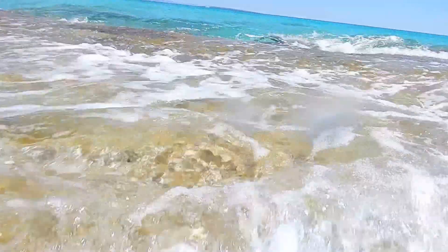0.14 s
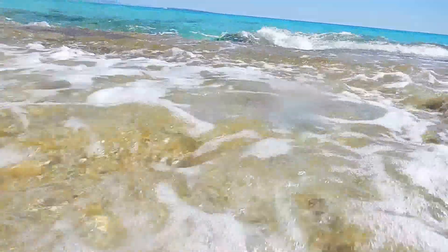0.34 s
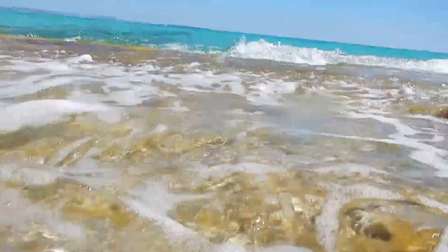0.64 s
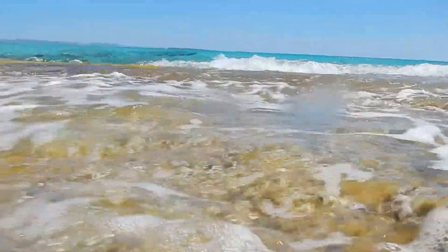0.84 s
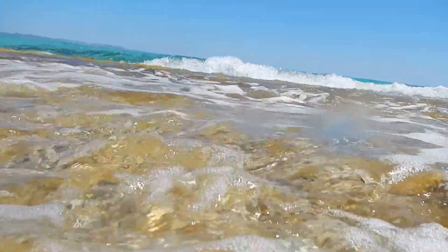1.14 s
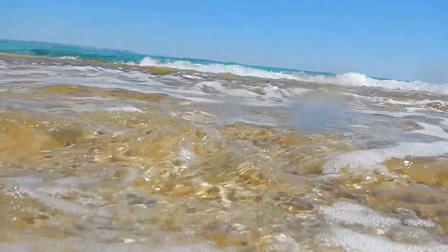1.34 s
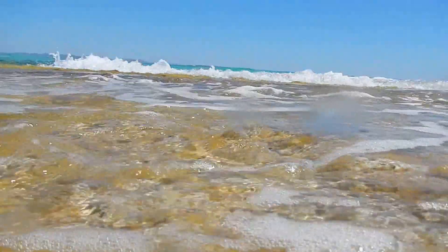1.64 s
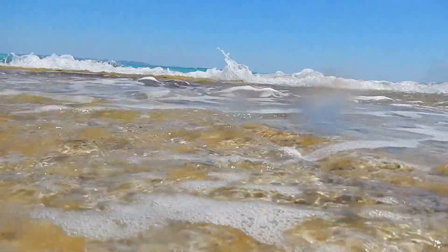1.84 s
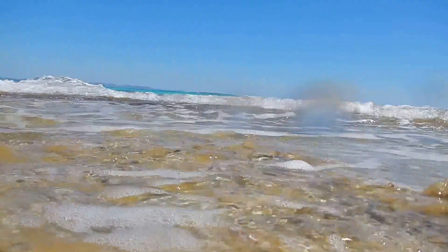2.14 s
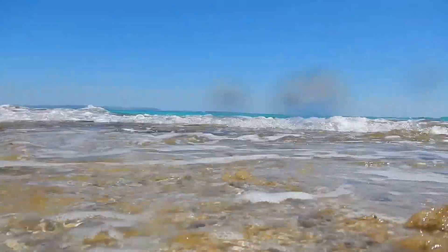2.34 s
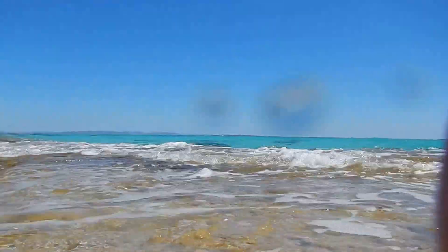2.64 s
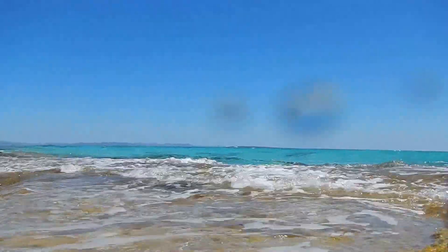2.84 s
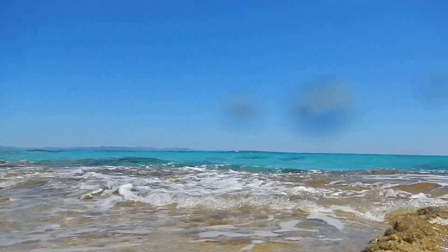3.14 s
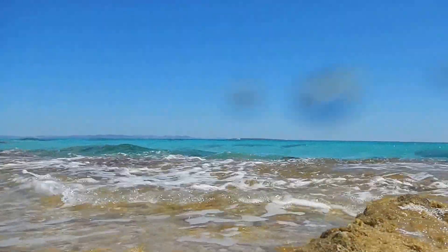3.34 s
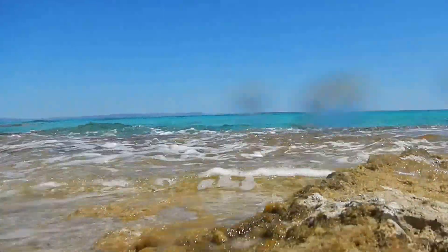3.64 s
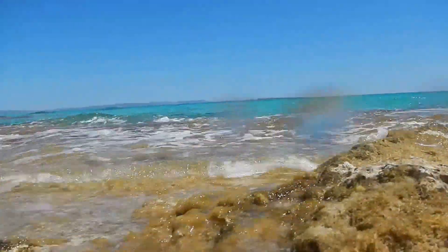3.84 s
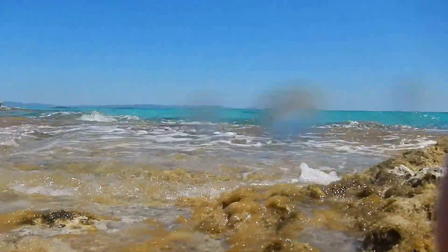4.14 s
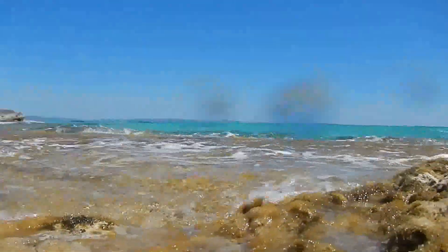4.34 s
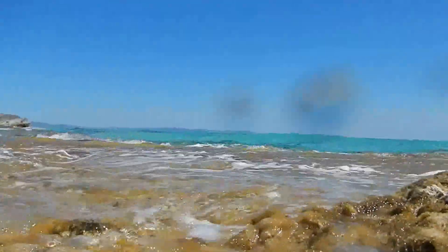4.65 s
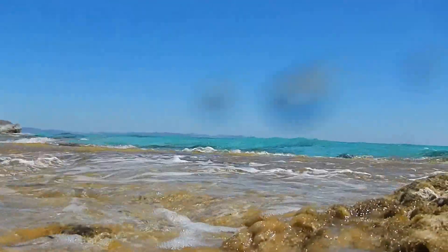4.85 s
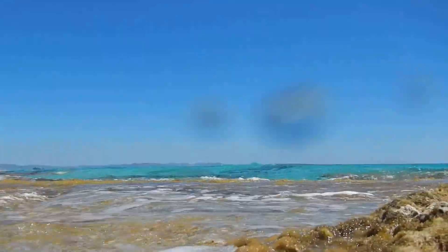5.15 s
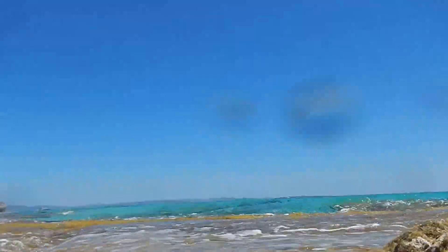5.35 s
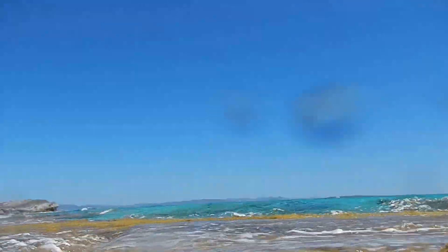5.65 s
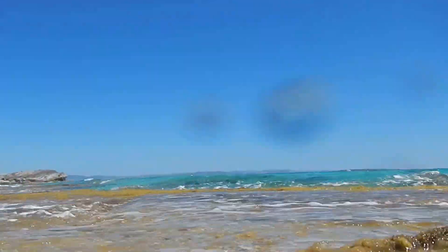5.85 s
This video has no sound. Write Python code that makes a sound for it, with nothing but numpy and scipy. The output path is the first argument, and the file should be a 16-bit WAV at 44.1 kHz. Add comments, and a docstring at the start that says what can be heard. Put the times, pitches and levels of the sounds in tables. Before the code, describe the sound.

Small waves wash over sand and shallow rocks, with steady bubbling and crackling foam, heard through a waterproof camera held just above the water. The tone is boxy. Drops and spray tap the case throughout, and two hard knocks early on briefly duck the volume. Wet fingers scrape the case midway, and near the end the grip slips in a quick run of ticks. A soft, uneven rumble comes and goes.

```python
"""Small waves around a waterproof camera

Surf, foam and bubbles wash over sand and rocks, heard through a camera case held just above the water.
The case rings near 1 kHz. Drops and spray strike it, fingers scrape and slip on it, and air and water
push on its two microphone openings, the ports. The camera turns itself down at each hard blow and
creeps back up, taking a faint electronic whine with it."""
import sys
import numpy as np
from scipy import signal
from scipy.fft import rfft, irfft, next_fast_len
from scipy.io import wavfile
from scipy.ndimage import uniform_filter1d, minimum_filter1d, map_coordinates

SR = 44100
rng = np.random.default_rng(int(sys.argv[2]) if len(sys.argv) > 2 else 0)


def unload_wav(signal):
    """Save mono or channel-first audio to the path in sys.argv[1] as 16-bit WAV at rate SR, clipped to [-1, 1]."""
    wavfile.write(
        sys.argv[1],
        SR,
        np.round(np.clip(np.atleast_2d(signal).T, -1, 1) * 32767).astype(np.int16),
    )


N = 265129

# How far the left port runs ahead of the right. Each row: frequency in Hz, lead in radians.
LEFT_LEAD = [(45, 4), (150, 2.5), (400, -0.08), (650, 1.49), (1000, -1.5), (1500, 1.68), (2300, -1.5),
             (4000, -1)]
SPLIT = np.array([[.5], [-.5]])  # shares a left-right difference between the two sides


def amp(db):
    """Turn decibels into a multiplier."""
    return 10 ** (np.asarray(db) / 20)


def unit(x):
    """Scale a signal to an average (rms) level of 1."""
    return x / np.sqrt(np.mean(x ** 2) + 1e-20)


def along(points, hz):
    """Read between (Hz, value) points, with octaves evenly spaced."""
    freqs, values = np.transpose(points)
    return np.interp(np.log(hz + 1), np.log(freqs + 1), values)


def wobble(rate):
    """A smooth curve through `rate` random values a second."""
    return map_coordinates(rng.standard_normal(int(N * rate / SR) + 4), [np.arange(N) * rate / SR])


def swell(s, rise, fall):
    """A bell curve that climbs to 1 at time s and sinks again."""
    t = np.arange(N) / SR - s
    return np.exp(-(t / np.where(t < 0, rise, fall)) ** 2 / 2)


def arch(n, skew):
    """A hump n samples long; a skew below 1 makes it peak early."""
    return np.sqrt(np.sin(np.pi * (np.arange(n) / n) ** skew))


def grains(n, rate, spread_db):
    """Two streams of tiny, uneven clicks at random times, about `rate` a second."""
    chance, size = rng.random((2, n)), rng.standard_normal((2, n))
    sign = np.sign(rng.standard_normal((2, n)))
    return (chance < rate / SR) * sign * amp(spread_db * np.clip(size, -2.5, 2.5))


def lowpass(x, hz):
    """Soften everything above hz."""
    return signal.sosfilt(signal.butter(2, hz, fs=SR, output="sos"), x)


def filtered(x, response):
    """Scale and shift each frequency by response(hz)."""
    size = next_fast_len(N + 8192)
    return irfft(rfft(x, size) * response(np.fft.rfftfreq(size, 1 / SR)), size)[..., :N]


def tinted(force, spectrum, tilt_db):
    """Send a force through a body that barely rings; tilt_db per octave brightens it."""
    hz = np.fft.rfftfreq(2048, 1 / SR)
    db = along(spectrum, hz) + tilt_db * np.log2(np.maximum(hz, 100) / 1000)
    # build the quickest response with this spectrum (minimum phase)
    cepstrum = irfft(np.log(amp(db)))
    causal = 1 + np.sign(np.fft.fftfreq(len(cepstrum)))
    response = irfft(np.exp(rfft(cepstrum * causal)))
    return signal.fftconvolve(force, response[None], axes=1)


def add(track, s, sound):
    """Mix a stereo sound into the track at s seconds."""
    part = track[:, max(0, round(s * SR)):][:, :sound.shape[1]]
    part += sound[:, :part.shape[1]]


def at_ports(pair, spectrum):
    """Colour and blend two unrelated signals into what the ports pick up, at level 1."""
    # How alike the ports sound. Each row: frequency in Hz, likeness from 0 to 1.
    likeness = [(100, 0.43), (280, 0.14), (500, 1), (850, 0.97), (1200, 1), (1800, 1), (2600, 0.12),
                (4000, 0.55), (10000, 0.33)]
    # Which port is louder. Each row: frequency in Hz, left minus right in dB.
    balance = [(200, 0), (400, -8.5), (750, 3.5), (1000, 4), (1250, 6), (1700, 0), (2150, 2), (2900, -3.5),
               (3600, 4), (6000, -2)]
    angle = lambda hz: np.arccos(np.clip(along(likeness, hz), 0, 1)) / 2
    colour = lambda hz: amp(along(spectrum, hz)) * [np.cos(angle(hz)), np.sin(angle(hz))]
    place = lambda hz: amp(SPLIT * along(balance, hz)) * np.exp(1j * SPLIT * along(LEFT_LEAD, hz))
    mid, side = filtered(pair, colour)
    return unit(filtered(np.array([mid + side, mid - side]), place))


def bubbles(count, pitch_hz, spread, cycles, rise):
    """Bubbles pinch off in the water: each rings briefly while its pitch rises."""
    t = np.arange(SR // 30) / SR
    start = rng.integers(0, N, (count, 1))
    tone, size = rng.standard_normal((count, 2)).T[:, :, None]
    hz = pitch_hz * np.exp(spread * tone)
    age = t * hz / cycles
    rings = amp(3.8 * size - 60 * age) * np.sin(2 * np.pi * hz * t * (1 + rise * age / 2))
    return np.bincount((start + np.arange(len(t))).ravel(), rings.ravel())[:N]


def wash(calm_surf_db=-57.5, calm_foam_db=-73, calm_bubbles_db=-59, fizz_db=-24, fizz_grows=2.3):
    """Each wave lifts the rushing surf, crackling foam and bubbling; thick foam fizzes brighter."""
    # Waves running up the shore. Each row: crest time in seconds, surf, foam and bubble levels in dB,
    # rise and fall widths in seconds.
    waves = [(0.472, -58.5, -80.5, -60, 0.29, 0.35), (0.952, -53, -69, -61.5, 1, 0.8),
             (2.05, -61.5, -70.5, -62.5, 0.18, 0.47), (4.2, -62, -76.5, -54.5, 0.58, 0.67),
             (5.8, -56.5, -75.5, -57.5, 0.085, 0.077)]
    # The tone of surf, foam, the finest foam and bubbles. Each row: frequency in Hz, relative dB.
    surf_tone = [(150, -31.5), (300, -11.5), (500, -17.5), (650, -3), (780, -10.5), (900, -3.5), (990, 5),
                 (1120, -5), (1350, -14), (1700, -41.5), (3000, -76), (8000, -110)]
    foam_tone = [(900, -48.5), (1300, 0), (1620, 4), (2000, -8.5), (2350, -5), (2900, -17.5), (3500, -23),
                 (4200, -32.5), (5500, -59.5), (10000, -79.5), (15000, -93.5)]
    fizz_tone = [(1500, -24), (3200, 6), (4500, -5), (6500, -14.5), (9000, -27), (15000, -43)]
    bubble_tone = [(200, -20.5), (600, -4.0), (1000, 2.0), (1500, -18.5), (3500, -22.0), (6000, -34.5)]
    power = amp([[calm_surf_db], [calm_foam_db], [calm_bubbles_db]]) ** 2
    for s, surf_db, foam_db, bubble_db, rise, fall in waves:
        power = power + (amp([[surf_db], [foam_db], [bubble_db]]) * swell(s, rise, fall)) ** 2
    surge_db = .7 * wobble(14) + .8 * wobble(55)
    surf_level, foam_level, bubble_level = np.sqrt(power) * amp(surge_db)
    surf = surf_level * at_ports(rng.standard_normal((2, N)), surf_tone)
    foam = foam_level * amp(wobble(45)) * at_ports(unit(grains(N, rate=7100, spread_db=6)), foam_tone)
    fizz_level = foam_level * unit(foam_level) ** (fizz_grows - 1) * amp(fizz_db + 1.3 * wobble(25))
    fizz = fizz_level * at_ports(unit(grains(N, rate=3800, spread_db=7)), fizz_tone)
    slosh = [bubbles(count=2600, pitch_hz=758.2, spread=0.185, cycles=35.3, rise=0.36) for _ in range(2)]
    return surf + foam + fizz + bubble_level * at_ports(np.array(slosh), bubble_tone)


def buffeting(calm_db=-61, drift_db=3.5):
    """Swirls of air and water push on the ports in uneven, rumbling lumps."""
    # Passing swirls. Each row: middle in seconds, left and right levels in dB, half length in seconds.
    eddies = [(0.236, -60.5, -55.5, 0.15), (0.731, -48, -47.5, 0.022), (1.044, -53.5, -63.5, 0.13),
              (1.474, -48.5, -54.5, 0.091), (2.801, -49, -45.5, 0.14), (3.052, -52, -52.5, 0.2),
              (4.35, -52, -69, 0.2), (4.897, -46, -53.5, 0.033), (5.311, -54.5, -56, 0.3),
              (5.827, -52.5, -49.5, 0.16)]
    # The tone of the rumble. Each row: frequency in Hz, relative level in dB.
    rumble_tone = [(15, 6), (36, -10), (58, 0), (105, 6.5), (170, -2), (260, -6.5), (450, -16.5),
                   (1000, -44.5), (3000, -87.5)]
    calm = amp(calm_db + drift_db * np.array([wobble(5.54), wobble(5.3)]))
    power = 0
    for s, left_db, right_db, width in eddies:
        power = power + (amp([[left_db], [right_db]]) * swell(s, width, width)) ** 2
    lumps = amp(1.8 * wobble(24) + 1.5 * np.array([wobble(30), wobble(30)]))
    rumble = at_ports(rng.standard_normal((2, N)), rumble_tone)
    return np.hypot(calm, np.sqrt(power)) * unit(lumps * rumble)


def case_ring(crack_db=-1, crack_hz=4400, crack_life_s=0.0007, left_lag_s=0.00015):
    """One blow makes a dry crack and a ring; every spot on the case rings a little differently."""
    # The case's own notes. Each row: pitch in Hz, level in dB, seconds to fade by 60 dB.
    notes = [(403, -3, 0.008), (553, 3.5, 0.005), (844, 3, 0.0061), (1013, 5, 0.018), (1200, 2.5, .006),
             (1428, 9, 0.0045), (1772, 10, 0.0046), (1930, 7.5, 0.0054), (2260, 5.5, 0.0038),
             (2580, 1.5, 0.004), (3550, -5, 0.011), (5960, -23, 0.003)]
    t = np.arange(SR // 20) / SR
    crack_detune = rng.normal(0, .1, (2, 1))
    ring = amp(crack_db - 60 * t / crack_life_s) * np.sin(2 * np.pi * crack_hz * (1 + crack_detune) * t)
    t = np.maximum(t - [[left_lag_s], [0]], 0)  # the notes reach the right port first
    for k, (hz, db, life) in enumerate(notes):
        spot_db = rng.normal(0, 2, (2, 1))
        detune = rng.normal(0, .035) + rng.normal(0, .015, (2, 1))
        note = amp(db + spot_db - 60 * t / life) * np.sin(2 * np.pi * hz * (1 + detune) * t)
        ring = ring - (-1) ** k * note  # neighbouring notes swing in opposite directions
    return ring


def strike(force, depth_db, bright_db, tick_db, edge_hz):
    """Ring the case, at peak 1: a mass of water favours the low band, a small hard drop the high ones."""
    # The case's depth, main, bright and tick bands. Each row: lower and upper edge in Hz.
    bands = [(280, 680), (720, 1300), (1350, 2600), (2800, 14000)]
    # Where each band sits: left minus right in dB.
    band_pans = [-11, -4, -3.5, -1.5]
    knock = signal.fftconvolve(force, case_ring(), axes=1)
    knock = lowpass(knock, min(edge_hz, SR / 3))
    sound = 0
    for band, db, pan_db in zip(bands, [depth_db, 0, bright_db, tick_db], band_pans):
        part = signal.sosfilt(signal.butter(3, band, "bandpass", fs=SR, output="sos"), knock)
        sound = sound + unit(part) * amp(db + pan_db * SPLIT)
    return sound / np.abs(sound).max()


def drops(flatten_s=0.0087, smear_db=-18, edge_hz=11000):
    """A drop strikes the case, then flattens against it for a few milliseconds."""
    # Hard drops. Each row: start in seconds, peak in dB, then the depth, bright and tick bands
    # in dB against the main ring.
    hits = [(0.0131, -32, -19, -1, -33), (.479, -39.5, -6, 17, -12), (0.7607, -27.5, -17, -10.5, -33.5),
            (0.815, -8.5, -23, -14, -37.5), (1.331, -19, 2, -19, -15), (1.5, -25, -15, -25, -46),
            (1.961, -40, -31, -16, -29), (2.035, -47.5, -25, 5, -9), (2.19, -44.5, -21, -22, -20),
            (2.224, -22.5, -32, 1, -23), (2.3268, -33, -7.5, -6, -24), (2.505, -55.5, -20, -5.5, 6),
            (2.5972, -28, -13.5, -4, -37.5), (2.728, -32.5, -10, -16.5, -41), (2.945, -29.5, -21, -1, -27),
            (3.1449, -21, -31, -5.5, -28.5), (3.3915, -22.5, -27, 2.5, -18.5),
            (4.463, -34.5, -2, -6.5, -20.5), (4.891, -39.5, -13, -8, -35), (4.9307, -24, -0.5, -11, -36),
            (5.0069, -25.5, -12.5, -8.5, -21.5), (5.0382, -17.5, -13, -11, -30.5),
            (5.71, -33, -17, -12, -34)]
    track, t = np.zeros((2, N)), np.arange(SR // 80) / SR
    for s, db, depth_db, bright_db, tick_db in hits:
        smear = lowpass(rng.standard_normal(len(t)), 2600)
        force = (t == 0) + amp(smear_db - 60 * t / flatten_s) * smear
        add(track, s, amp(db) * strike(force[None], depth_db, bright_db, tick_db, edge_hz))
    return track


def foam_patches(rate=5000, spread_db=6, clump_db=3.5):
    """Patches of foam brush the case and burst in clumps."""
    # Each row is a patch: middle in seconds, level in dB, half length in seconds, tilt in dB per octave.
    patches = [(.4, -73, 0.054, -3.5), (0.482, -81, .02, 1), (0.615, -83, .06, -1), (0.723, -79.5, 0.02, 4),
               (2.796, -88, 0.046, 3), (4.463, -83.5, 0.015, 4), (4.718, -85, 0.02, 4),
               (4.802, -89, .12, 2), (4.918, -75, 0.013, 4.5), (5.781, -85.5, .04, 5.5)]
    # The tone of the bursting. Each row: frequency in Hz, relative level in dB.
    patch_tone = [(900, -20), (1600, 0.5), (2300, 3.5), (3300, -1.5), (4500, -10), (6500, -17),
                  (10000, -26), (15000, -33)]
    track = np.zeros((2, N))
    for s, db, width, tilt_db in patches:
        n = int(6 * width * SR)
        shape = signal.windows.gaussian(n, width * SR) * amp(clump_db * wobble(70)[:n])
        fizz = tinted(grains(n, rate, spread_db) * shape, patch_tone, tilt_db)
        bell_energy = 2 * np.sqrt(np.pi) * width * SR
        add(track, s - n / SR / 2, amp(db) * fizz * np.sqrt(bell_energy / np.sum(fizz ** 2)))
    return track


def spray(rate=2200, edge_hz=15000, octaves_per_db=0.61):
    """Short showers of soft droplets swell quickly and thin out; harder ones sound brighter."""
    # Splats on the case. Each row: start in seconds, peak in dB, length in seconds, then the depth,
    # bright and tick bands in dB against the main ring.
    splats = [(0.407, -35, .028, -16.5, -19, -36), (0.461, -37, .012, -17.5, -17, -35),
              (0.683, -38.5, 0.026, -10, -23, -30), (0.721, -33, .036, -5.5, -6, -33.5),
              (2.29, -26.5, 0.008, -14, -9, -32), (2.464, -25, 0.01, -8, 3, -32),
              (2.475, -30, 0.013, -21, -2, -25), (4.78, -35, 0.0081, -21.5, -24, -46),
              (4.904, -30.5, 0.03, -12.5, -16, -32), (5.652, -32, 0.0075, -24.5, -4.5, -24),
              (5.715, -33, .02, -11.5, -9, -28)]
    track = np.zeros((2, N))
    for s, db, length, depth_db, bright_db, tick_db in splats:
        n = int(length * SR)
        hits = rng.standard_normal((3, n)) * (rng.random((3, n)) < rate / SR) * arch(n, skew=0.61)
        force = hits[0] + hits[1:] / 3  # shared hits, plus weaker ones for each port
        cutoff_hz = edge_hz * 2 ** (octaves_per_db * tick_db)
        add(track, s, amp(db) * strike(force, depth_db, bright_db, tick_db, cutoff_hz))
    return track


def plops(attack_s=0.00052, snap_db=-29):
    """Water slaps a port: a dull push of a few cycles, with a faint snap as it lands."""
    # Each row is a slap: start in seconds, left and right peaks in dB, pitch in Hz, fade in seconds.
    slaps = [(0.703, -47, -42.5, 52, 0.072), (1.298, -37, -19.5, 72.6, 0.009),
             (1.329, -34, -9.5, 231, 0.011), (1.331, -22, -7, 350, 0.012), (1.425, -46.5, -27, 126, 0.013),
             (1.914, -34, -30.5, 483, 0.0041), (2.798, -34.5, -38, 95, 0.044),
             (4.1232, -32.5, -30, 538, 0.015), (4.719, -36.5, -37.5, 43.2, 0.26)]
    track, t = np.zeros((2, N)), np.arange(SR // 6) / SR
    for s, left_db, right_db, hz, life in slaps:
        lead = along(LEFT_LEAD, hz) * np.array([[1], [0]])
        onset = 1 - np.exp(-(t / attack_s) ** 2)
        push = onset * amp(-60 * t / life) * np.sin(2 * np.pi * hz * t + lead)
        push /= np.abs(push).max(axis=1, keepdims=True)
        # quick slaps snap harder than slow heaves
        snap = amp(snap_db - 60 * t / .004) * hz / 400 * lowpass(rng.standard_normal(len(t)), 2200)
        add(track, s, amp([[left_db], [right_db]]) * (push + snap))
    return track


def mostly_shared(pair, apart_db=-12):
    """Both ports get the first signal; a little of the second sets them apart."""
    return pair[0] + amp(apart_db) * pair[1] * [[1], [-1]]


def finger_scrapes(catch_rate=1700, grit_db=-12):
    """Wet fingers slide on the case and damp it: tiny catches crackle over fine grit."""
    # Each row is a slide: start in seconds, level in dB, length in seconds, tilt in dB per octave.
    slides = [(2.377, -59, .022, -2), (2.591, -48.5, 0.018, -3), (2.606, -51, 0.093, -4),
              (2.872, -38, .022, .5), (2.907, -38, .024, 1.5), (2.998, -58, 0.11, -.5),
              (3.113, -57, 0.044, 1), (3.15, -51.5, .025, -2), (3.177, -43.5, 0.027, -4),
              (3.261, -55.5, 0.044, -2)]
    # The case under a sliding finger. Each row: frequency in Hz, relative level in dB.
    slide_tone = [(150, -34), (400, -17), (700, -12.5), (1000, 2), (1300, -4), (1560, 4), (1670, 0.5),
                  (1780, 5), (2000, -4), (2400, -4.5), (3000, -20), (3600, -18), (4400, -36.5), (6000, -40),
                  (8000, -50.5), (14000, -61)]
    track = np.zeros((2, N))
    for s, db, length, tilt_db in slides:
        n = int(length * SR)
        pressure = arch(n, skew=0.51)
        friction = unit(grains(n, catch_rate, spread_db=2)) + amp(grit_db) * rng.standard_normal((2, n))
        rasp = tinted(mostly_shared(friction * pressure), slide_tone, tilt_db)
        add(track, s, amp(db) * rasp * np.sqrt(2 * n / np.sum(rasp ** 2)))
    return track


def finger_slips(chatter_db=-13, chatter_life_s=0.044):
    """The grip slips in jerks, each one a sharp tick that chatters out."""
    # Each row is a jerk: start in seconds, peak in dB, tilt in dB per octave.
    jerks = [(5.0058, -20.5, 2.5), (5.012, -31, 0), (5.038, -20.5, 1), (5.0552, -18.5, 0), (5.0631, -20, 0),
             (5.0745, -15.5, 0.5), (5.085, -18, -1.5), (5.0969, -20.5, -1), (5.1032, -22, 2),
             (5.109, -26.5, -0.5), (5.118, -28.5, -1.5), (5.1344, -21, -.5), (5.145, -28, 0),
             (5.163, -32, -0.5), (5.184, -33.5, 3.5), (5.199, -34, 1)]
    # The case under a tight grip. Each row: frequency in Hz, relative level in dB.
    grip_tone = [(60, -32), (150, -17.5), (300, -5), (500, 2), (720, -4), (1000, 6), (1300, -5.5),
                 (1650, -2), (2050, -19.5), (2600, -22), (3650, -35.5), (4300, -58.5), (9000, -74.5)]
    track, t = np.zeros((2, N)), np.arange(SR // 40) / SR
    for s, db, tilt_db in jerks:
        chatter = amp(chatter_db - 60 * t / chatter_life_s) * rng.standard_normal((2, len(t))) / 2
        tick = tinted(mostly_shared((t == 0) + chatter), grip_tone, tilt_db)
        add(track, s, amp(db) * tick / np.abs(tick).max())
    return track


def grip_to_ports(touches, left_lag_s=.00015):
    """Finger sounds reach the two ports unevenly, and the left one a little late."""
    # Which port hears the fingers more. Each row: frequency in Hz, left minus right in dB.
    balance = [(300, -10), (1000, -1), (1600, -1.5), (2300, 3.5), (3300, 4), (6000, -1.5)]
    delay = lambda hz: np.exp(-2j * np.pi * hz * SPLIT * left_lag_s)
    return filtered(touches, lambda hz: amp(SPLIT * along(balance, hz)) * delay(hz))


def scene():
    """Everything that reaches the two microphones."""
    shore = wash() + foam_patches() + buffeting() + drops() + spray() + plops()
    return shore + grip_to_ports(finger_scrapes() + finger_slips())


def gain_control(x, full_db=36, ceiling_db=-2.5, start_cut_db=15, release_db_per_s=17):
    """Peaks over the ceiling pull the volume down at once; then it creeps back up."""
    over_db = 20 * np.log10(np.abs(x).max(axis=0) + 1e-9) + full_db - ceiling_db
    recovery_db = release_db_per_s * np.arange(N) / SR
    held_db = np.maximum.accumulate(np.maximum(np.maximum(over_db, 0) + recovery_db, start_cut_db))
    cut_db = held_db - recovery_db
    gain_db = uniform_filter1d(minimum_filter1d(full_db - cut_db, size=45), size=45)  # smooth over 1 ms
    return x * amp(gain_db)


def record(dry, whine_hz=14835, top_hz=16200):
    """The camera adds its circuit's faint whine, rides the volume and cuts the highest treble."""
    whine = amp([[-96], [-101]]) * np.sin(2 * np.pi * whine_hz * np.arange(N) / SR)
    return filtered(gain_control(dry + whine), lambda hz: hz < top_hz)


dry = scene()
out = record(dry)
unload_wav(out)
```